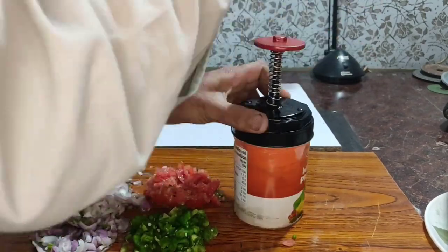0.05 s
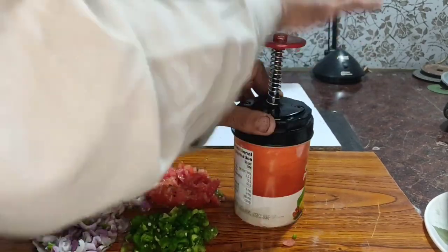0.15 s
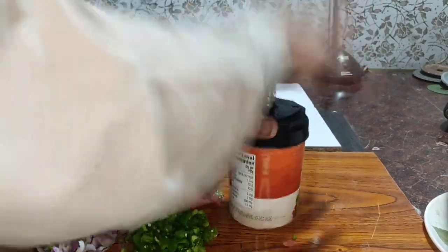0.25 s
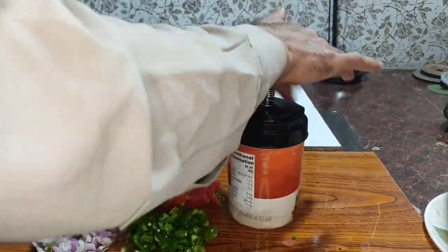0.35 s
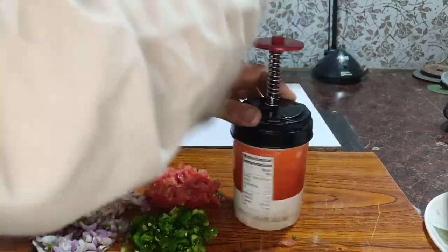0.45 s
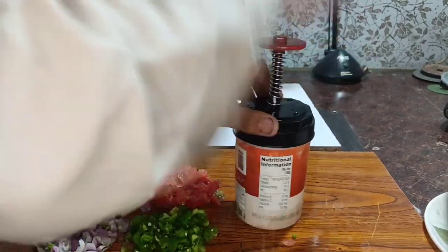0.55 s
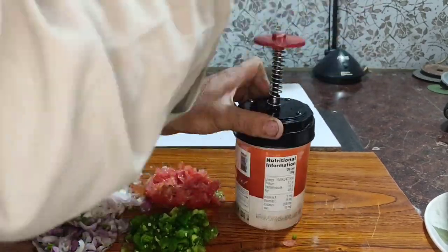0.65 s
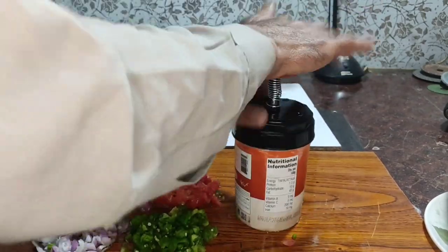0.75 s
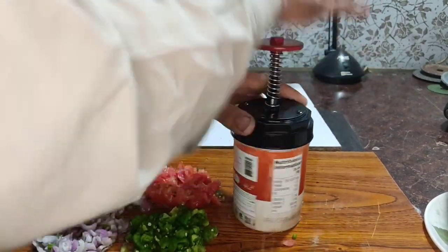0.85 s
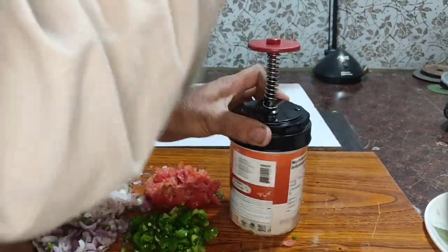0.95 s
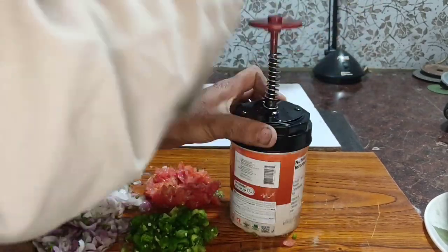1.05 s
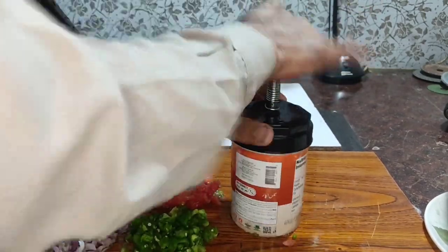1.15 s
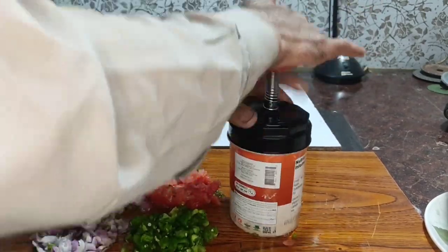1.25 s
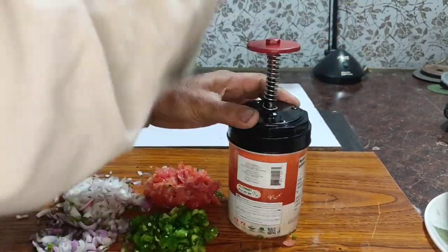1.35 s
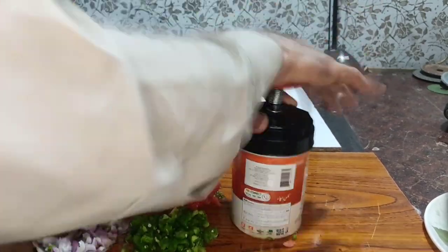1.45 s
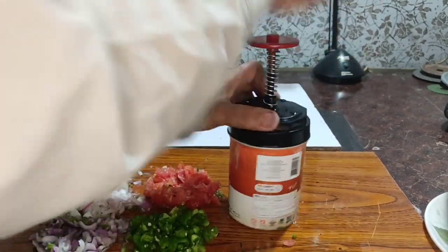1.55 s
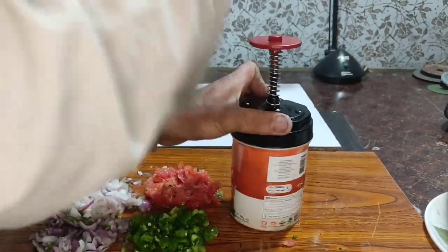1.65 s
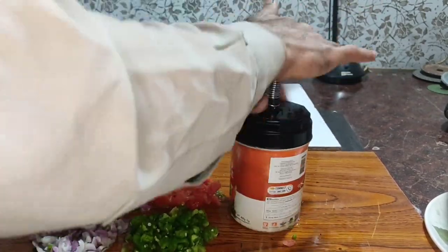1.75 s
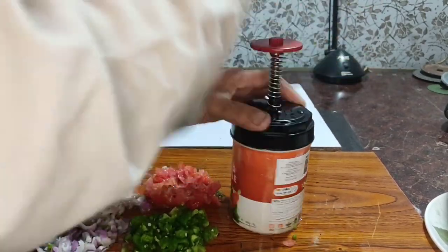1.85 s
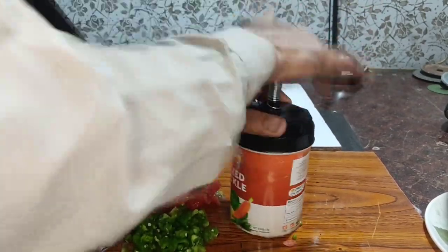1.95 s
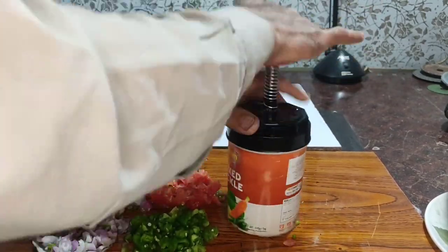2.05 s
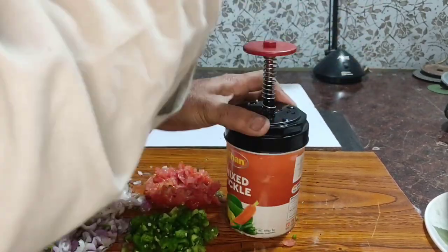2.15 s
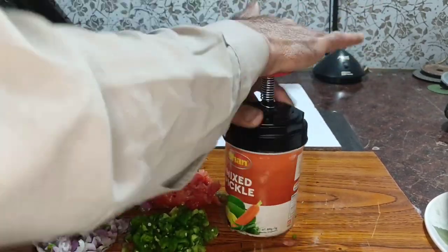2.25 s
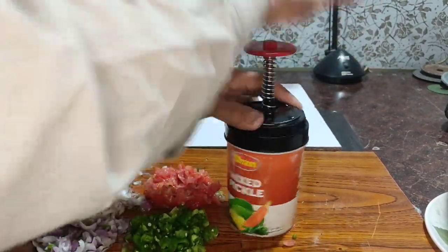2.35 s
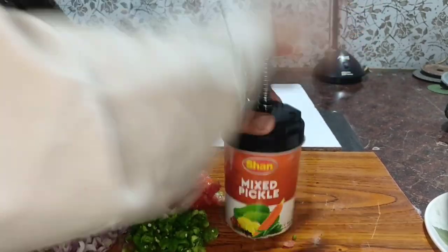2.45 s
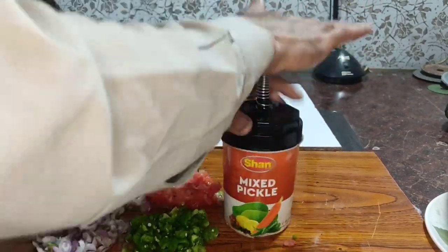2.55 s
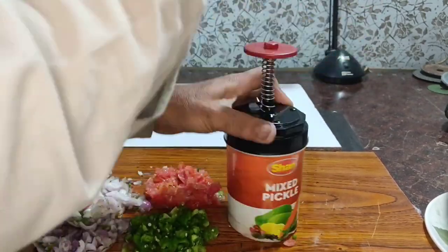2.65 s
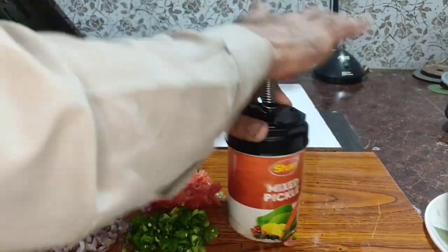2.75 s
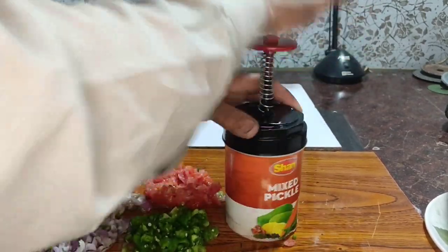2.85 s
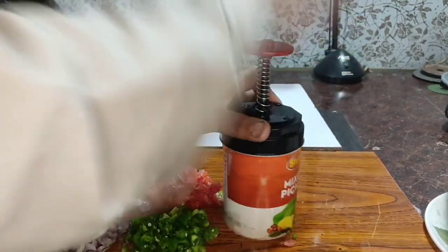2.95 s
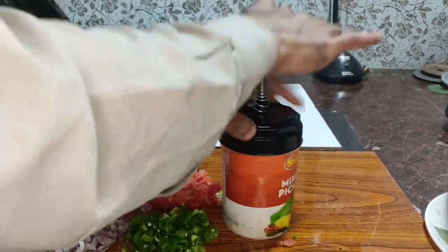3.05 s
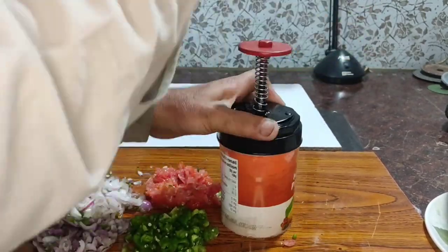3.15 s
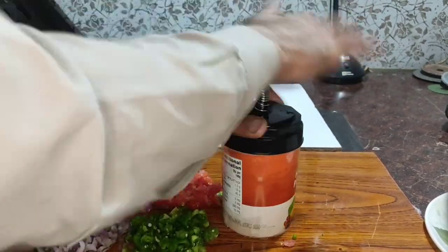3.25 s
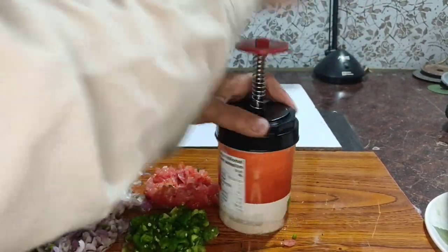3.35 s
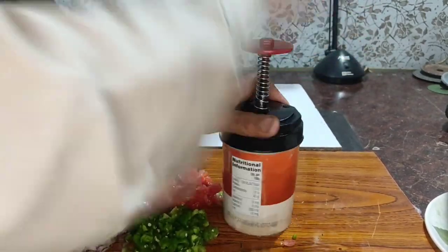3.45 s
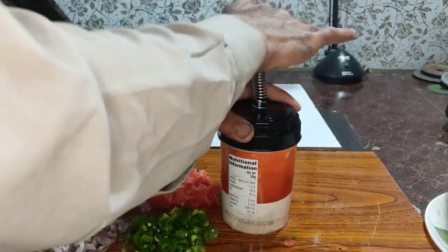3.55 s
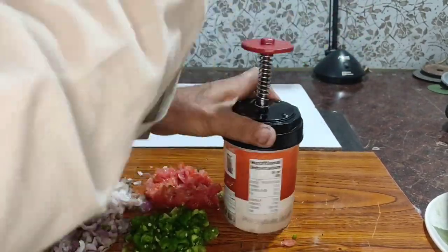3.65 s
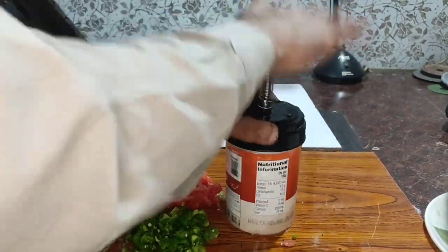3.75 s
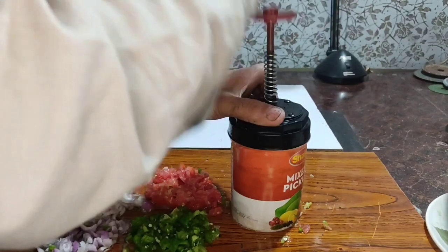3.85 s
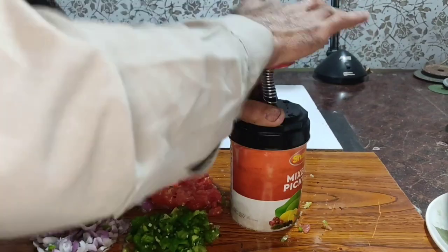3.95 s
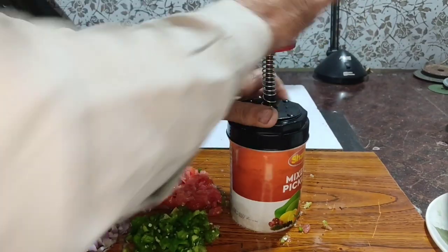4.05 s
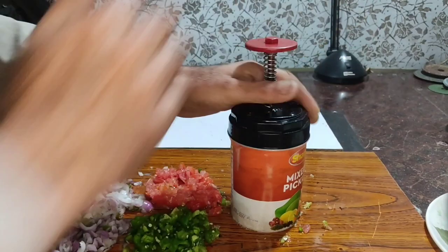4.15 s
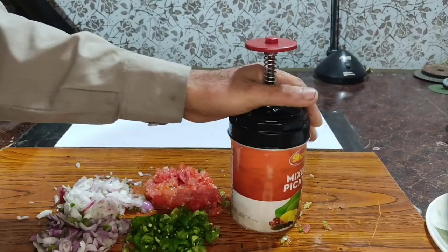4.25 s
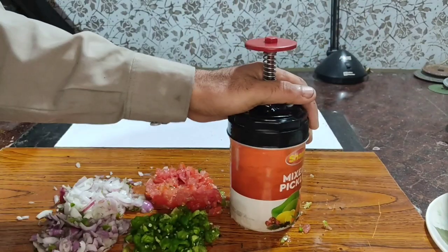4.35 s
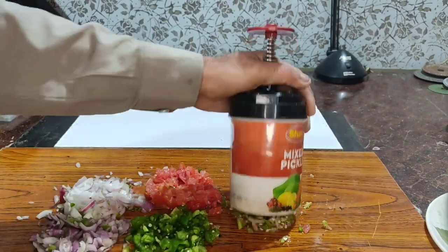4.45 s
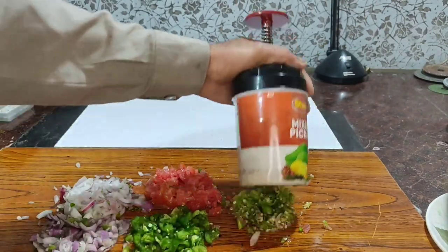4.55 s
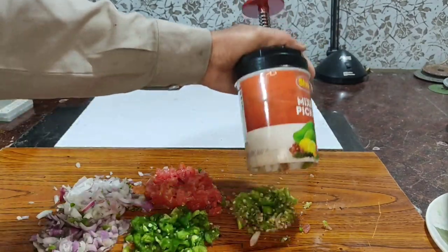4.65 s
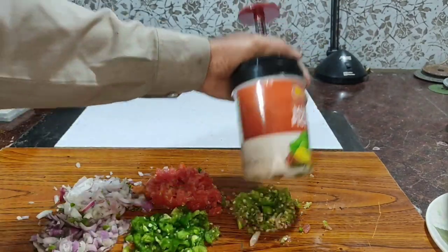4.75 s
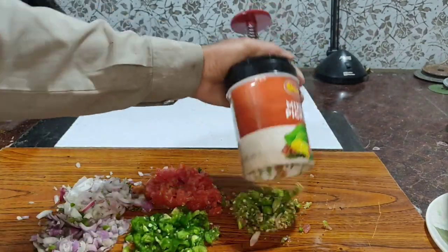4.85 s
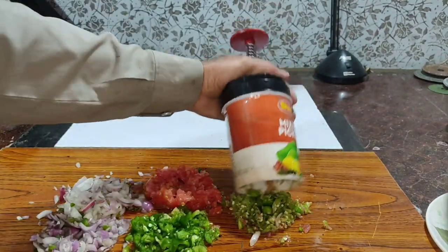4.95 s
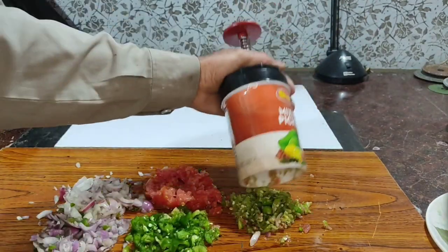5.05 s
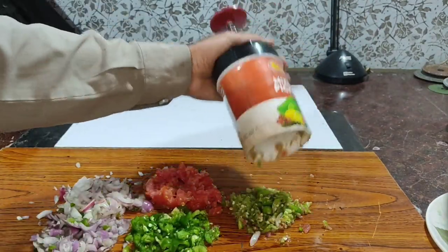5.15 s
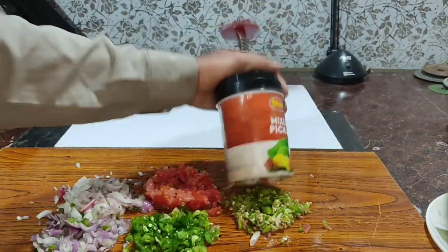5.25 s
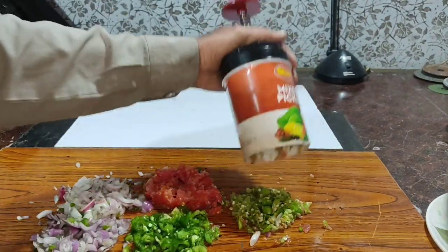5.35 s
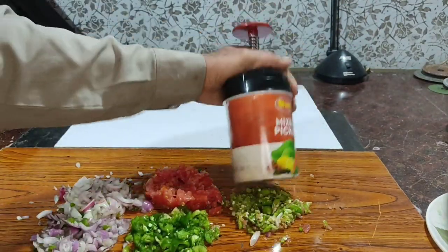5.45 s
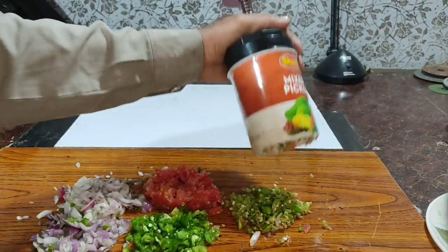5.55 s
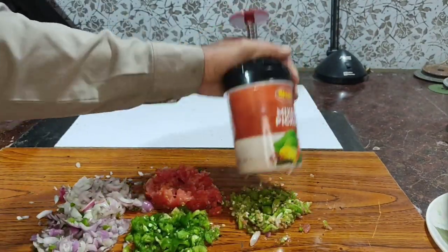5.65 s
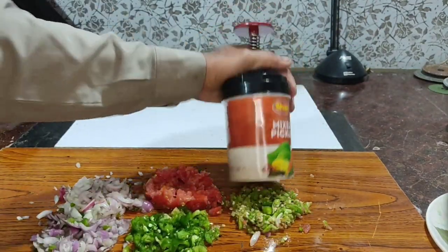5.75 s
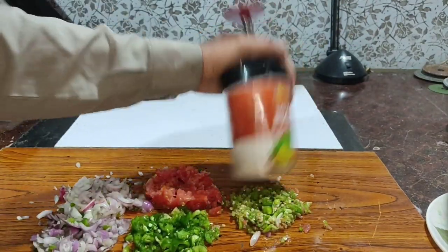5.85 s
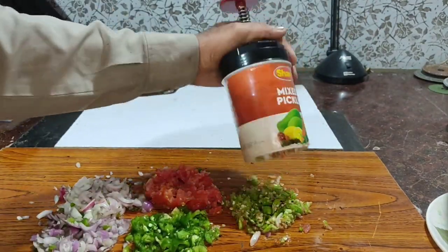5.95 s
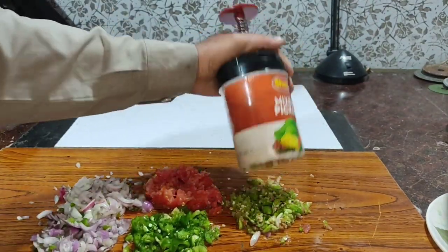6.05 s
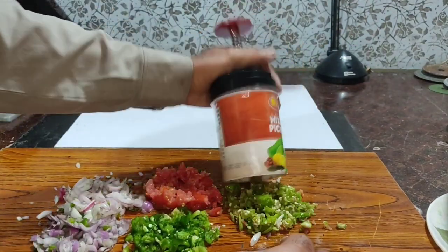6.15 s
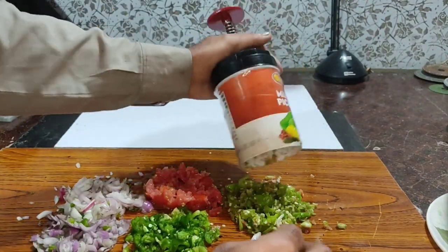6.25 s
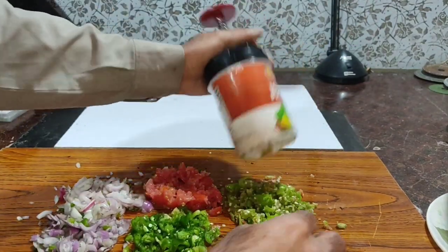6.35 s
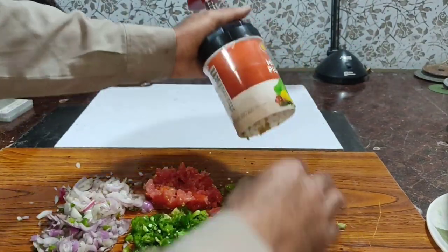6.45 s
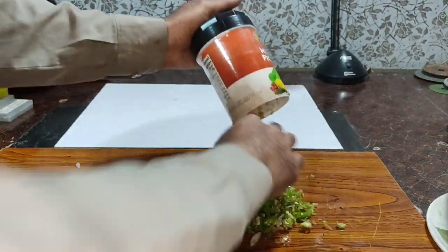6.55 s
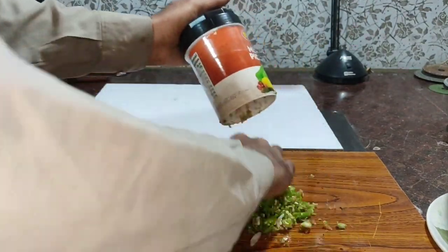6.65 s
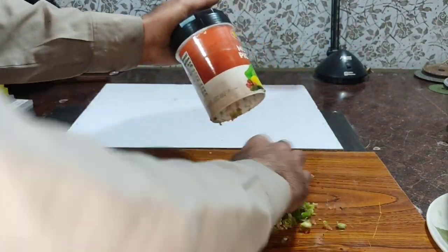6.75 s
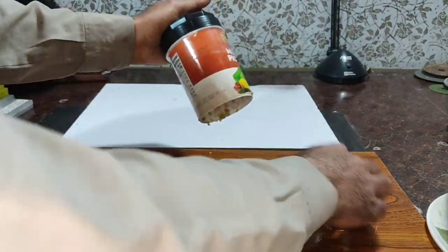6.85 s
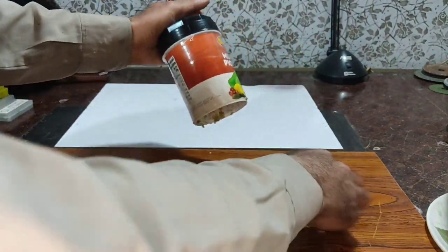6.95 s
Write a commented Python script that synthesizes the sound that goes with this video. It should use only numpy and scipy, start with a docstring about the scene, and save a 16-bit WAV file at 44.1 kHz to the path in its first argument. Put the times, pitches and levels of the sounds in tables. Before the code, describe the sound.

In a small, hard kitchen, a hand pumps a spring-loaded plastic tub chopper on a wooden board. About four hits a second give a thud, plastic clack and steely judder, with the plunger clattering back between them. After four seconds it pauses, with faint rubbing and a thin squeak, then the lifted tub is shaken in hollow knocks. Close stereo microphone, steady quiet hiss.

```python
"""Blades thud, clack and ring on a wooden board in a small room; then a plunger knocks about in an empty tub.
A spring plunger chopper made from a plastic tub is slapped down, judders and clatters back against its lid.
Then the tub is lifted and shaken, with a thin squeak, and a hand brushes the pieces together.
Each contact is noise under a force envelope, exciting the resonances of a heavy body, plastic and steel.
Room reflections and a steady hiss surround the blows."""
import sys
import numpy as np
from scipy import signal
from scipy.fft import rfft, irfft, next_fast_len
from scipy.io import wavfile

SR = 44100
rng = np.random.default_rng(int(sys.argv[2]) if len(sys.argv) > 2 else 0)


def to_wav(s):
    """Save 16-bit WAV."""
    ch = np.atleast_2d(s).T  # columns
    pcm = np.round(np.clip(ch, -1, 1) * 32767)  # PCM
    wavfile.write(sys.argv[1], SR, pcm.astype(np.int16))


N = 309141
SIZE = 16384   # samples in one contact
STROKE_S = (np.arange(SIZE) - SIZE // 4) / SR   # time around one contact
STROKE_HZ = np.fft.rfftfreq(SIZE, 1 / SR)


def from_db(db):
    """Level is logarithmic: 20 dB is a factor of ten in amplitude."""
    return 10 ** (np.asarray(db) / 20)


def at_hz(points, hz, axis=1):
    """Interpolate one column of a table along logarithmic frequency, that is, along pitch."""
    points = np.array(points)
    return np.interp(np.log(np.maximum(hz, 1)), np.log(points[:, 0]), points[:, axis])


def with_energy(x, energy):
    """Energy is the sum of squares: scale two channels so that their mean energy has this value."""
    return x * np.sqrt(energy / (np.sum(x ** 2) / 2 + 1e-20))


def add(out, s, sound):
    """Superposition: sounds add linearly, here with the contact's time zero at s."""
    start = round(s * SR) - SIZE // 4
    first, last = max(start, 0), min(start + SIZE, N)
    out[:, first:last] += sound[:, first - start:last - start]


def stereo_noise(size, alike):
    """Interchannel correlation: white noise whose sides share a middle part; alike is their correlation."""
    mid, side = rng.standard_normal((2, size))
    return np.sqrt(1 + alike) * mid + np.sqrt(1 - alike) * np.array([side, -side])


def resonance(centre, width):
    """Damped oscillator: a two-pole frequency response, about 1 at its top, narrower with less damping."""
    r = np.exp(-np.pi * width / SR)
    poles = [1, -2 * r * np.cos(2 * np.pi * centre / SR), r * r]
    return (1 - r * r) / 2 * rfft([1, 0, -1], SIZE) / rfft(poles, SIZE)


def body(modes):
    """Modal superposition: resonances in parallel, with alternating signs."""
    response = 0
    for k, (hz, width_hz, level_db) in enumerate(modes):
        response = response + (-1) ** k * from_db(level_db) * resonance(hz, width_hz)
    return response


def passband(low_hz, high_hz, order):
    """Band-limiting: the frequency response of a flat band with smooth edges."""
    edges = signal.butter(order, [low_hz, high_hz], "band", fs=SR, output="sos")
    return signal.sosfreqz(edges, STROKE_HZ, fs=SR)[1]


def excite(response, force, alike, snap=0):
    """Source and filter: tiny uneven contacts, with one firm snap at the force's top, set a body ringing."""
    grain_db = 3.3   # spread of the tiny contacts
    grains = from_db(grain_db * np.repeat(rng.standard_normal(SIZE // 32), 32))
    push = with_energy(stereo_noise(SIZE, alike) * grains * force, 1)
    push[:, np.argmax(force)] += snap
    return with_energy(irfft(rfft(push) * response), np.sum(force ** 2))


def blow(half_s, swell, swell_s, lag_s):
    """Envelope in time: a soft swell leads in, and within it a core sets in abruptly and decays."""
    t = (STROKE_S - lag_s) / half_s
    onset = (1 + np.tanh(4 * (t + 1.13))) / 2
    core = onset * np.exp(-np.maximum(t, 0))
    soft = np.exp(-np.abs(t) * half_s / (half_s + swell_s))
    return (1 - swell) * core + swell * soft


def clack(parts, half_s, thud_db, clack_db, steel_db, wall_hz):
    """Coupled bodies: one contact sounds all three; the grip decides which wall resonance stands out."""
    heavy, plastic, steel = parts
    firm = min(0.0026 / half_s, 1)   # short contacts are one firm blow, long ones a clatter
    wall = plastic * (1 + 1.2 * resonance(wall_hz, 177))
    thud_force = blow(half_s, swell=0.69, swell_s=0.0042, lag_s=-0.00036)
    crack_force = blow(half_s, swell=0.55, swell_s=0.0035, lag_s=-0.0005)
    ring_force = blow(half_s, swell=0.58, swell_s=0.0036, lag_s=-0.0003)
    thud = excite(heavy, thud_force, alike=0.78, snap=0.86 * firm)
    crack = excite(wall, crack_force, alike=0.55, snap=0.65 * firm)
    ring = excite(steel, ring_force, alike=0.15, snap=0.3 * firm)
    return from_db(thud_db) * thud + from_db(clack_db) * crack + from_db(steel_db) * ring


def weighted(level_db, weight_db, body_db):
    """Spectral balance: thud, clack and steel in dB; what goes into the thud is taken from the steel."""
    return level_db + body_db + weight_db, level_db, level_db + body_db - weight_db


def room_air():
    """Stationary noise: a quiet, even hiss with a fixed spectral density."""
    # steady air of the room: hz, density_db (relative, per Hz)
    air_colour = [(18, -59), (30, -27), (81, -19), (292, -4), (359, -8.5), (443, -5.5), (532, -9),
                  (575, -5), (767, -5), (852, -7.5), (1680, -7), (1970, -11), (5040, -22.5), (7860, -13),
                  (15500, -56)]
    level_db = -51.5
    size = next_fast_len(N)
    colour = from_db(at_hz(air_colour, np.fft.rfftfreq(size, 1 / SR)))
    hiss = irfft(rfft(stereo_noise(size, alike=0.05)) * colour, size)[:, :N]
    return from_db(level_db) * with_energy(hiss, N)


def springing_back(parts):
    """Elastic recoil: the spring throws the plunger against the lid, where it touches again more softly."""
    # plunger against the lid: start_s, half_length_s, lid_db, spring_db, strongest_lid_resonance_hz
    lid_hits = [(0.02, 0.03, -25.5, -33, 1270), (0.484, 0.0089, -22.5, -36, 1360),
                (0.507, 0.0016, -24.5, -25, 1070), (0.8, 0.012, -17, -22.5, 1430),
                (0.901, 0.039, -36, -41.5, 910), (0.937, 0.0037, -35.5, -27.5, 920),
                (1.123, 0.0057, -16.5, -20, 1330), (1.233, 0.027, -22, -24, 1770),
                (1.365, 0.023, -39.5, -40.5, 955), (1.635, 0.0055, -28, -23, 910),
                (1.905, 0.012, -40, -35, 910), (2.175, 0.0057, -29, -39.5, 1410),
                (2.408, 0.01, -28.5, -38, 1280), (2.673, 0.0079, -21.5, -36, 1310),
                (2.923, 0.011, -19.5, -28.5, 1330), (3.162, 0.011, -19.5, -29.5, 1300),
                (3.422, 0.011, -21, -32.5, 1400), (3.675, 0.013, -29.5, -31, 1490),
                (3.884, 0.022, -28.5, -30, 1070), (3.93, 0.024, -29.5, -31, 1010),
                (4.011, 0.0037, -17, -18, 1650), (4.132, 0.011, -28.5, -34.5, 1740)]
    settle_s, settle_length = 0.037, 0.98   # delay of the second touch, and its length against the first
    loose_half_s = 0.011   # returns shorter than this are caught firmly and settle less
    out = np.zeros((2, N))
    for s, half_s, lid_db, spring_db, lid_hz in lid_hits:
        thud_db = -15.5 + 0.46 * lid_db   # the board follows part of the return's strength
        add(out, s, clack(parts, half_s, thud_db, lid_db, spring_db, lid_hz))
        settle = clack(parts, half_s * settle_length, thud_db=thud_db - 9.5, clack_db=lid_db - 19,
                       steel_db=lid_db - 17.5, wall_hz=lid_hz)
        add(out, s + settle_s, min(half_s / loose_half_s, 1) * settle)
    return out


def room(x):
    """Reverberation: diffuse reflections decay octave by octave; the bass lingers in standing waves."""
    # decay of the room: hz, t60_s, level_db
    decay = [(100, 0.39, -3), (246, 0.41, -7), (567, 0.33, -13.5), (1620, 0.22, -17.5), (3830, 0.14, -5.5),
             (9200, 0.22, -21.5), (16600, 0.036, 4)]
    # standing waves in the room: hz, width_hz, level_db
    standing = [(125, 12, 1), (192, 14, 2.5), (253, 16, -3)]
    t, tail = np.arange(SR) / SR, 0
    for hz in 110 * 2 ** np.arange(8):
        band = signal.butter(2, [hz / np.sqrt(2), hz * np.sqrt(2)], "band", fs=SR, output="sos")
        build_up = 1 - np.exp(-(t / 0.0025) ** 2)
        dying = stereo_noise(SR, alike=0.39) * from_db(-60 * t / at_hz(decay, hz)) * build_up
        octave = signal.sosfilt(band, with_energy(dying, 1))
        tail = tail + from_db(at_hz(decay, hz, axis=2)) * octave
    tail[:, :SIZE] += irfft(body(standing))
    return signal.fftconvolve(x, tail, axes=1)[:, :N]


def coil_ticks(steel):
    """Impulsive release: a coil that snaps past the rod rings the steel alone."""
    # spring coils snap past the rod: start_s, level_db
    snaps = [(0.067, -27), (0.478, -24), (0.57, -37), (0.585, -42), (0.771, -26), (0.893, -28),
             (1.892, -27.5), (2.4, -25.5), (2.475, -40), (3.206, -35), (3.464, -22), (3.528, -27.5),
             (3.68, -23.5), (4.404, -35.5), (4.477, -41), (6.055, -38), (6.476, -45)]
    out = np.zeros((2, N))
    slip = blow(0.0011, swell=0.17, swell_s=0.0071, lag_s=0)
    for s, level_db in snaps:
        add(out, s, from_db(level_db) * excite(steel, slip, alike=0.2))
    return out


def cushioned(parts, s):
    """Absorption: whole pieces under the blades swallow the deep bass of the first chops."""
    heavy, plastic, steel = parts
    depth_db, fade_s, corner_hz = 7.5, 0.77, 121
    deep = 1 / (1 + (STROKE_HZ / corner_hz) ** 4)
    loss_db = depth_db * np.exp(-(s / fade_s) ** 2) * deep
    return heavy * from_db(-loss_db), plastic, steel


def judder(parts, hold_s, fade_s, rumble_fade_s):
    """Sustained excitation: the squeezed spring chatters and the board shudders, then both die down."""
    heavy, plastic, steel = parts
    after = np.maximum(STROKE_S, 0)
    start = 1 - np.exp(-after / 0.00079)
    chatter = start / np.hypot(1, np.exp((after - hold_s) / fade_s))
    shudder = start / np.hypot(1, np.exp((after - hold_s) / rumble_fade_s))
    return (from_db(-27.5) * excite(heavy, shudder, alike=0.39)
            + from_db(-28) * excite(plastic, chatter, alike=0.018)
            + from_db(-31.5) * excite(steel, chatter, alike=0.062))


def chopping(parts):
    """Impact and rebound: blades hit the board, bounce once and leave the spring juddering."""
    # blades hit the board: start_s, level_db, weight_db (steel to wood), strongest_wall_resonance_hz
    slaps = [(0.202, -14, -4.5, 2660), (0.355, -14, -6, 1340), (0.66, -12, -0.5, 1480),
             (1.093, -14, -3, 1640), (1.546, -10.5, 1, 1840), (1.782, -13, 0, 1580),
             (2.046, -11.5, 0.5, 1090), (2.308, -14, -0.5, 1080), (2.567, -14.5, -0.5, 1430),
             (2.824, -14.5, -2, 1250), (3.071, -15, -3, 1420), (3.323, -13.5, -4.5, 1030),
             (3.57, -13, -3.5, 1700), (3.819, -17, -4.5, 2770), (4.022, -21, 0, 1730)]
    half_s, body_db = 0.0037, -5   # length; wood and steel against the plastic clack
    bounce_s, bounce_half_s = 0.038, 0.0074   # delay and length of the bounce
    out = np.zeros((2, N))
    for s, level_db, weight_db, wall_hz in slaps:
        struck = cushioned(parts, s)
        thud_db, clack_db, steel_db = weighted(level_db, weight_db, body_db)
        add(out, s, clack(struck, half_s, thud_db, clack_db, steel_db, wall_hz))
        # all three levels of the bounce follow the chop's thud
        bounce = clack(struck, bounce_half_s, thud_db=thud_db - 6, clack_db=thud_db - 14,
                       steel_db=thud_db - 10.5, wall_hz=wall_hz)
        add(out, s + bounce_s, bounce)
        # the spring bottoms out equally hard on every chop
        add(out, s, judder(struck, hold_s=0.027, fade_s=0.043, rumble_fade_s=0.063))
    return out


def dips():
    """Amplitude modulation: the level dips for a few milliseconds, twice in a row."""
    # first dip of each pair: start_s
    dip_starts = [3.86, 6.16]
    gap_s, half_s, depth_db = 0.0445, 0.0035, 13
    t, depth = np.arange(N) / SR, 0
    for s in dip_starts:
        for lag_s in (0, gap_s):
            depth = depth + np.exp(-((t - s - lag_s) / half_s) ** 2)
    return from_db(-depth_db * depth)


def brushing(parts):
    """Light friction: a hand and wet pieces brush tub and board in soft rubs of one colour."""
    # rubs: start_s, half_length_s, level_db
    rubs = [(4.43, 0.026, -49), (4.832, 0.012, -49), (5.652, 0.028, -61), (6.068, 0.016, -47),
            (6.655, 0.05, -53)]
    out = np.zeros((2, N))
    for s, half_s, level_db in rubs:
        rub = clack(parts, half_s, thud_db=level_db - 5.5, clack_db=level_db,
                    steel_db=level_db - 2.5, wall_hz=1420)
        add(out, s, rub)
    return out


def squeak():
    """Friction noise through a resonance: steel scrapes thinly on steel as the tub is lifted."""
    # one scrape: start_s, half_length_s, hz, width_hz, level_db
    scrape = (4.44, .04, 5940, 200, -51)
    s, half_s, hz, width_hz, level_db = scrape
    out = np.zeros((2, N))
    rub = np.exp(-(STROKE_S / half_s) ** 4)
    add(out, s, from_db(level_db) * excite(resonance(hz, width_hz), rub, alike=0.37))
    return out


def shaking(parts):
    """Inertia: each jerk of the lifted tub throws the loose plunger against its stop."""
    # knocks: start_s, half_length_s, level_db, weight_db (steel to thud), strongest_wall_resonance_hz
    plunger_hits = [(4.898, 0.0029, -34.5, 9.5, 1110), (5.008, 0.00081, -32.5, -2.5, 2040),
                    (5.036, 0.01, -41, 0.5, 920), (5.359, 0.0029, -21.5, 0, 1160),
                    (5.547, 0.002, -17, 3, 1080), (5.715, 0.0037, -19.5, 1.5, 980),
                    (5.85, 0.0044, -20.5, 2, 930), (5.975, 0.01, -25, 1.5, 1180),
                    (6.1, 0.0033, -19, 2, 1190), (6.279, 0.0037, -27.5, 3.5, 1830),
                    (6.33, 0.0018, -39.5, 2, 870)]
    body_db = -2   # hollow and steel against the plastic clack
    out = np.zeros((2, N))
    for s, half_s, level_db, weight_db, wall_hz in plunger_hits:
        add(out, s, clack(parts, half_s, *weighted(level_db, weight_db, body_db), wall_hz))
    return out


def scene():
    """Boundary conditions set the modes: a tub pressed on the board, then held free in the air."""
    # Columns of each: hz, width_hz, level_db (before the band filters below)
    # tub pressed on the board
    board_modes = [(116, 25, -11), (175.1, 26.7, -3.5), (191, 23, -0.5), (302.4, 72, -2), (375, 154, -4),
                   (547, 247, -5.5)]
    # air and wall of the lifted, open tub
    hollow_modes = [(119.4, 9.9, -14), (191.3, 32, -6), (256, 137, -11), (423, 61, -3.5), (590, 230, -17)]
    # plastic lid and wall
    plastic_modes = [(932, 227, 1), (1153, 147, 5.5), (1217, 179, 4.5), (1604, 207, 0.5), (1970, 400, -6),
                     (2356, 208, 0.5), (2490, 460, -3)]
    # lid, struck from below by the returning plunger
    lid_modes = [(830, 108, 0), (1096, 137, 0.5), (1340, 143, -1), (1576, 88, 1), (1896, 224, -4),
                 (2290, 210, -5), (2730, 410, -7)]
    # wall of the lifted tub
    free_wall_modes = [(740, 155, -1), (1035, 123, 0), (1195, 124, -1), (1600, 310, -7.5),
                       (1900, 146, -2.5), (2426, 160, -8), (3200, 610, -13)]
    # blades, rod and spring
    steel_modes = [(4120, 1360, -9.5), (5330, 116, 1.5), (6330, 1850, 0), (7120, 630, 8), (8390, 2270, -4)]

    mids = passband(low_hz=713, high_hz=3380, order=2)
    plastic, lid, free_wall = body(plastic_modes) * mids, body(lid_modes) * mids, body(free_wall_modes) * mids
    crisp = from_db(-25) * passband(low_hz=13000, high_hz=14600, order=2)   # fine top of hard contacts
    steel = body(steel_modes) * passband(low_hz=3575, high_hz=8910, order=3) + crisp
    edges = from_db(-3.5) * passband(low_hz=2900, high_hz=5280, order=1)   # edges on wood crack more broadly
    blades = steel + edges
    spring = steel * (1 + 0.18 * resonance(7060, 370))   # released, the spring rings freely
    bass = passband(low_hz=101, high_hz=954, order=3)
    shove = from_db(-24) * passband(low_hz=24.8, high_hz=109, order=1)   # the tub pushes a little air
    board = body(board_modes) * bass + shove
    hollow = body(hollow_modes) * bass + from_db(-9) * shove

    returns = springing_back((board, lid, spring)) + coil_ticks(spring)
    strokes = chopping((board, plastic, blades))
    handling = brushing((board, plastic, steel)) + squeak()
    shaken = shaking((hollow, free_wall, spring))
    dry = strokes + returns + shaken + handling
    return (dry + room(dry) + room_air()) * dips()


def record(dry):
    """Transducer response: each port has its own colour; peaks are rounded and the top is cut."""
    # the two microphone ports: hz, left_minus_right_db
    port_tilt = [(100, 4), (500, 4), (1100, 4), (1600, 1), (3500, 0.5), (5500, -0.5), (6900, -9.5),
                 (7700, 3.5), (8500, -0.5), (10000, 1), (15000, -0.5)]
    size = next_fast_len(N + SIZE)
    tilt_db = at_hz(port_tilt, np.fft.rfftfreq(size, 1 / SR))
    ports = from_db([tilt_db / 2, -tilt_db / 2])
    ports = ports / np.sqrt(np.mean(ports ** 2, axis=0))   # the tilt keeps the mean power of both sides
    heard = irfft(rfft(dry, size) * ports, size)[:, :N]
    rounded = 0.95 * np.tanh(heard / 0.95)
    cut = signal.ellip(10, 0.2, 80, 15600, fs=SR, output="sos")   # order, ripple dB, stop dB, cutoff Hz
    return signal.sosfilt(cut, rounded)


dry = scene()
out = record(dry)
to_wav(out)
```